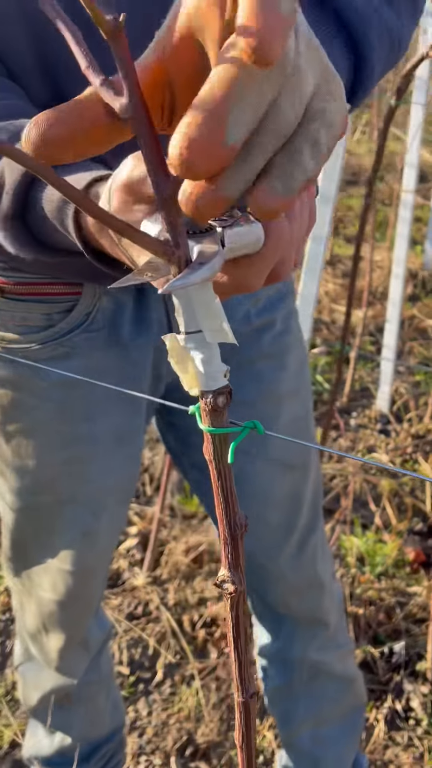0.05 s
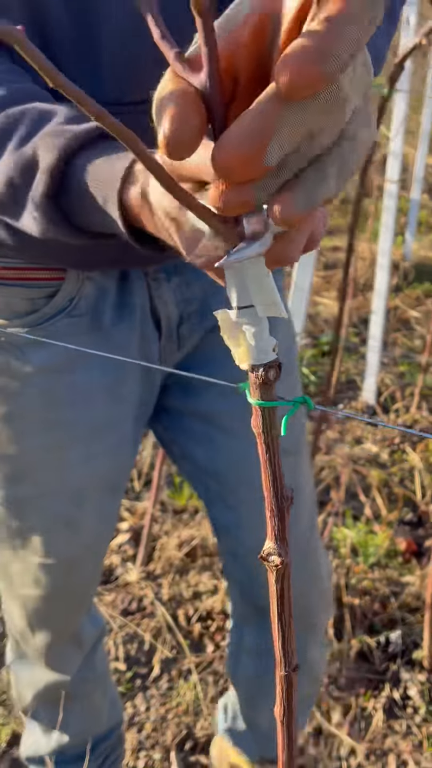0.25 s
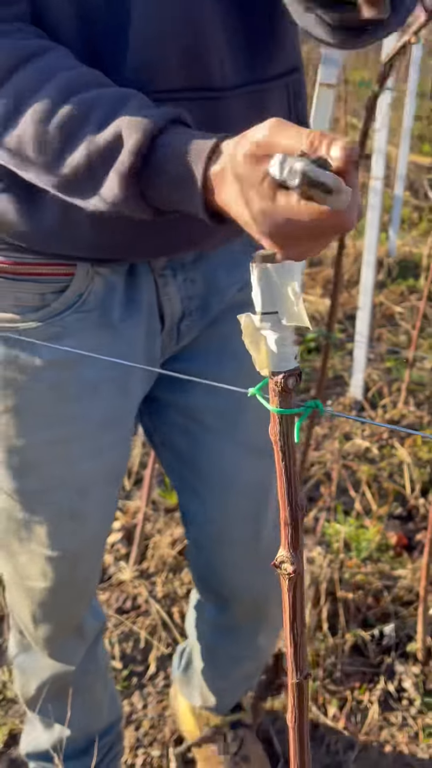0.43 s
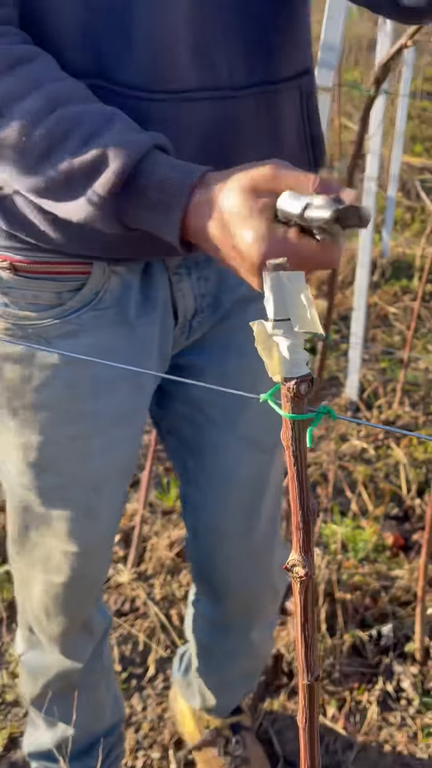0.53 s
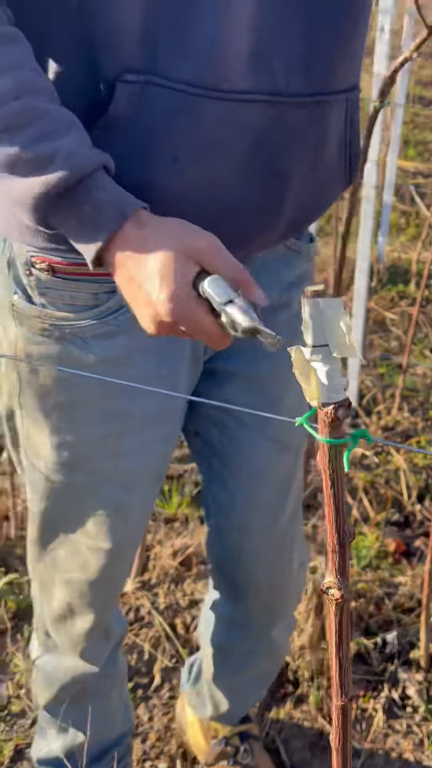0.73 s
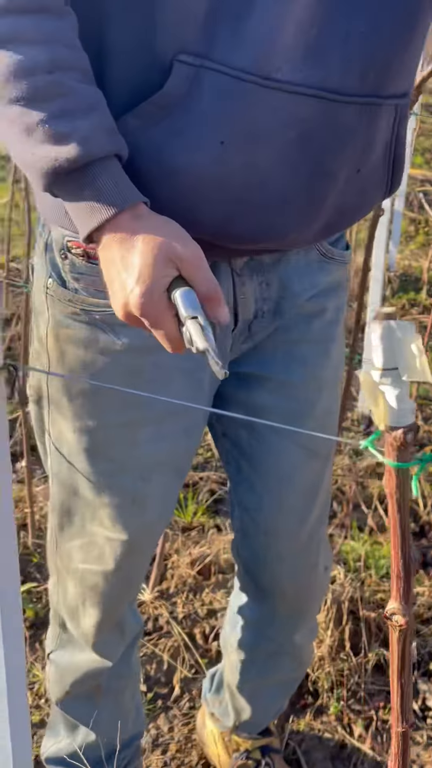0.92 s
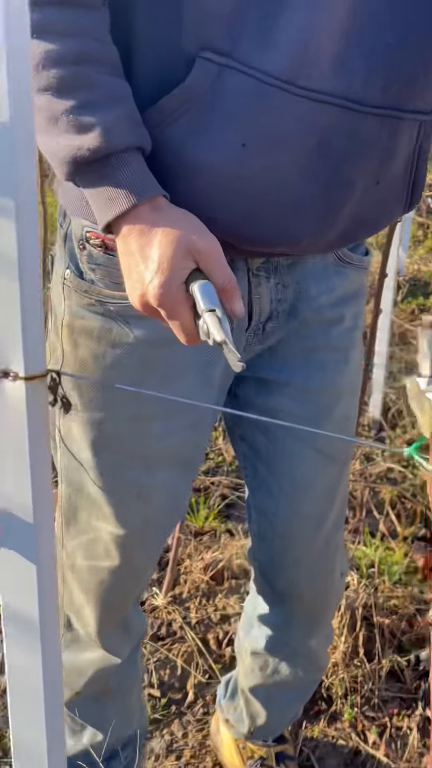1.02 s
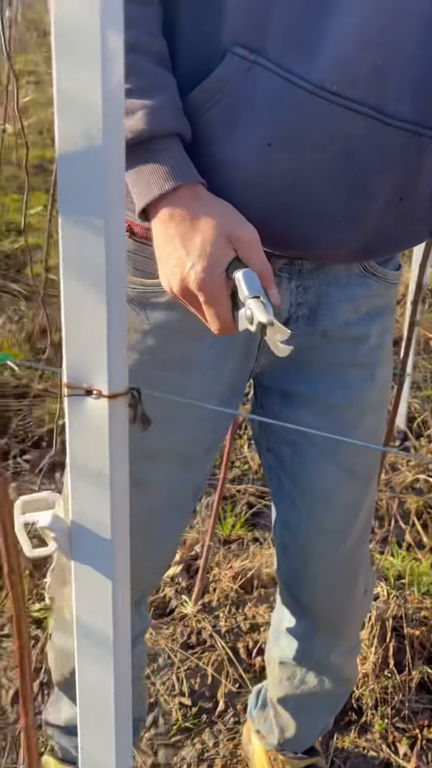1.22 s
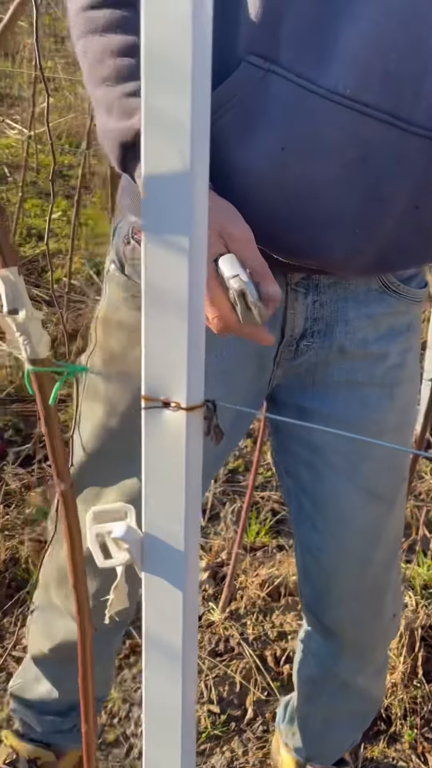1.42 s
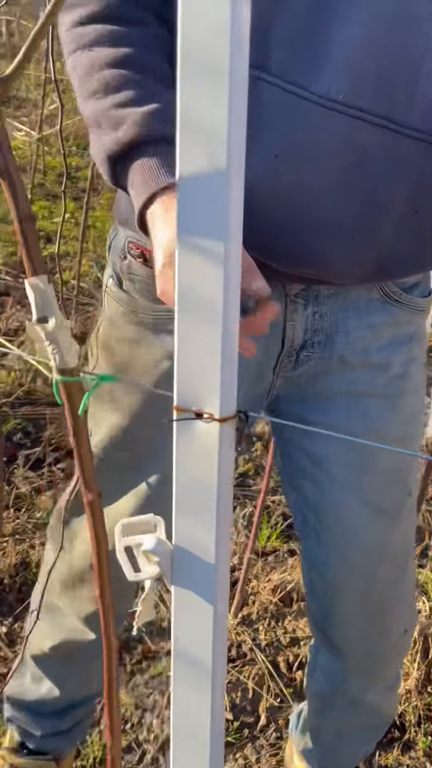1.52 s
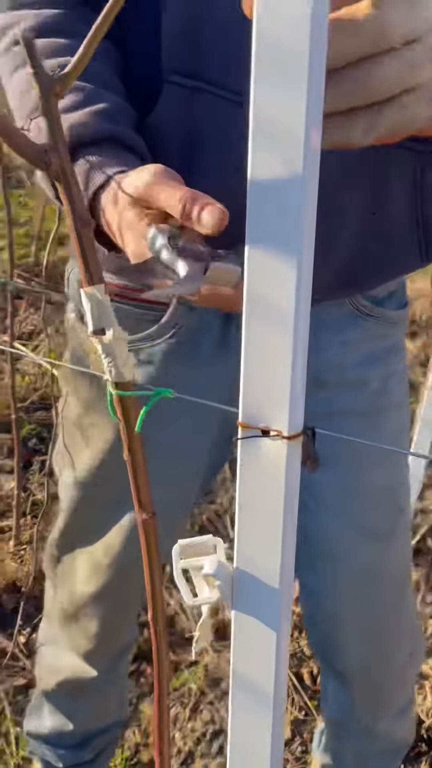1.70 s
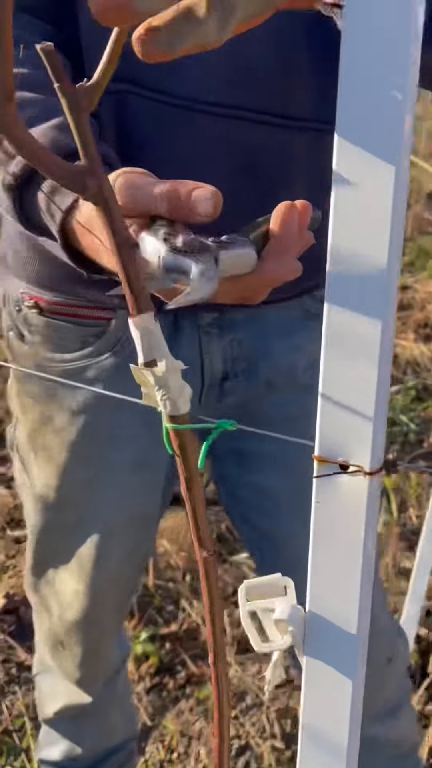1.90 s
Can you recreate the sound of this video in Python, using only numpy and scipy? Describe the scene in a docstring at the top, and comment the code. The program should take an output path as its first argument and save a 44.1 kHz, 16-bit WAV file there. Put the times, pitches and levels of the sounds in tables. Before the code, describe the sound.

Close to the microphone in an open field, pruning shears cut a woody stem with a brief crunch and a sharp snap. Light clothing rustle and crisp crackles of dry stalks follow as someone takes a few soft steps.

```python
"""Hand pruners cut a woody stem close by: fibres crack one by one over a crunch, the stem snaps
and rings, the handles thud on their stop, the blades click. The worker then steps over dry plants,
which rustle and crackle, with soft footfalls and boot knocks. Brief rubs, three faint tones and
a low outdoor rumble lie behind. Cracks are decaying noise bursts; thuds are damped sines."""
import sys
import numpy as np
from scipy import signal
from scipy.fft import rfft, irfft, next_fast_len
from scipy.io import wavfile
from scipy.ndimage import uniform_filter1d

SR = 44100
rng = np.random.default_rng(int(sys.argv[2]) if len(sys.argv) > 2 else 0)


def transcribe(u):
    """Save the signal u as a 16-bit wav file named by the first command-line argument.

    u: samples, shape (n,) or (channels, n), limited to [-1, 1]; the rate is SR.
    q: integer samples, one column per channel.
    """
    v = np.clip(np.atleast_2d(u).T, -1, 1)
    q = np.round(v * 32767).astype(np.int16)
    wavfile.write(sys.argv[1], SR, q)


N = 85995

# Levels are taken ahead of each layer's gain and filters.
# fibres giving way under the blade: t/s, level/dB
FIBRE_BREAKS = [(.2027, -31), (.2042, -29), (.2105, -38), (.2232, -38), (.2316, -29), (.2458, -26),
                (.2565, -25), (.2592, -20), (.2677, -17), (.2778, -29), (.2810, -28)]
# envelope of wood being crushed and torn: t/s, level/dB
CRUNCH_ENVELOPE = [(.228, -49), (.258, -37.5), (.285, -32.5), (.297, -44.5), (.316, -38), (.338, -82)]
# fractures of the final snap: t/s, level/dB
SNAP_BREAKS = [(.2888, -30), (.2909, -18), (.2936, -11), (.2966, -12.5), (.2996, -20), (.3052, -29)]
# stem resonances: f/Hz, level/dB re each break
WOOD_MODES = [(1600, -19.5), (2550, -19)]
# handles hitting their stop and rebounding: t/s, level/dB
HANDLE_HITS = [(.3012, -20), (.3063, -30)]
# steel touching steel: t/s, level/dB
BLADE_HITS = [(.3003, -21), (.3110, -17)]
# dry stalks breaking: t/s, level/dB, woody body/dB re level
STALK_BREAKS = [(0.3658, -38, -11.5), (0.411, -37.5, -12.5), (0.4486, -37, -12), (0.5483, -46, -4),
                (0.624, -48.5, 3), (0.7387, -34.5, -6), (0.8322, -30.5, -15.5), (0.8542, -26, -16.5),
                (0.888, -33, -19), (0.9085, -31, -15), (0.98, -34.5, -20), (1.0373, -25.5, -12),
                (1.083, -24.5, -15), (1.187, -26, -27), (1.2636, -30.5, -13.5), (1.2770, -35, -7.5),
                (1.29, -27.5, -14.5), (1.3368, -25.5, -16), (1.4006, -30, -39), (1.444, -36, -22),
                (1.547, -37.5, -12.5), (1.5813, -27.5, -19), (1.717, -37, -12), (1.8406, -31, -12),
                (1.9428, -26, -13)]
# brittle stalks parting in one tick: t/s, level/dB
STALK_TICKS = [(.079, -32), (1.0962, -13.5), (1.2772, -14.5), (1.6818, -28)]
# rustle of clothes and plants: t/s, level/dB
RUSTLE_ENVELOPE = [(0, -42), (.05, -51.5), (.33, -47), (.39, -56), (.50, -61), (.725, -49.5), (.76, -46.5),
                   (.95, -53.5), (1.065, -53.5), (1.11, -45.5), (1.19, -46), (1.245, -62.5), (1.295, -50.5),
                   (1.37, -44.5), (1.50, -52.5), (1.57, -45), (1.62, -55.5), (1.66, -44.5), (1.69, -56),
                   (1.77, -48.5), (1.89, -62), (1.95, -43)]
# treble shelf of the rustle: t/s, gain/dB
RUSTLE_SHELF = [(.3, -4), (.8, -5), (1.1, -0.5), (1.55, -2), (1.8, -3)]
# footfalls: peak t/s, level/dB, 1/e half width/s
FOOTFALLS = [(0.61, -53.5, 0.032), (1.298, -49.5, 0.049), (1.841, -48.5, 0.064)]
# boot knocks on soil: t/s, level/dB
BOOT_KNOCKS = [(1.039, -38), (1.718, -39)]
# rubs of gloves, blade and boots: t/s, centre f/Hz, level/dB
RUBS = [(.008, 614, -51), (0.083, 1070, -46.5), (0.11, 1750, -51), (0.63, 900, -56), (0.8, 1320, -49.5),
        (1.822, 1350, -49.5)]
# background tones: peak t/s, f/Hz at the peak, level/dB
FAINT_TONES = [(.385, 760, -56), (.422, 465, -55), (.685, 530, -56)]
# source spectra: f/Hz, relative level/dB
FIBRE_SPECTRUM = [(100, -6), (600, -12), (1150, -3.5), (1900, 2), (2700, -4), (3500, -13), (4500, -4.5),
                  (7200, -1), (9200, -2), (11000, 3), (12300, -12), (13500, -23)]
SNAP_SPECTRUM = [(100, -21.5), (400, -11.5), (680, -23), (1300, -6), (2100, -7), (2550, 0), (3200, -2),
                 (3800, -19), (4600, -0.5), (7400, -0.5), (11200, 0.5), (12100, -7.5), (12700, -4.5),
                 (13700, -27)]
BLADE_SPECTRUM = [(1000, -7), (7000, -11), (9300, -24), (10400, 6.5), (11400, -15), (13000, -37)]
CRISP_SPECTRUM = [(2000, -61), (4000, -9), (6000, -14.5), (7200, 1.5), (9000, 1), (10300, 5), (11200, 1),
                  (12200, -8), (13200, -19), (16000, -43)]
WOODY_SPECTRUM = [(100, -34.5), (500, -4), (2600, 1.5), (3700, -4.5), (6000, 5), (16000, -50)]
RUSTLE_SPECTRUM = [(100, -3.5), (260, -0.5), (700, -5), (1500, -8), (3800, -7.5), (5000, -8), (6500, -1.5),
                   (8500, -6), (10600, 6), (11700, -7), (12600, -15), (14000, -57)]
STEP_SPECTRUM = [(20, -15), (75, 2), (130, -5), (2000, -65)]
AIR_SPECTRUM = [(20, -8), (40, -0.5), (70, 2.5), (250, -14.5), (1000, -14), (10000, -41), (14000, -79)]
# stereo balance of cut and ground: f/Hz, left minus right level/dB
CUT_BALANCE = [(100, 7), (400, -11.5), (950, 14.5), (1400, 1), (2000, -8), (2900, -9.5), (4300, 6),
               (5200, -0.5)]
GROUND_BALANCE = [(100, 2.5), (300, -12), (750, 10), (1500, 4.5), (2300, -.5)]
# phase lead of left over right: f/Hz, phase/rad
LEFT_LEAD = [(250, 0), (500, 1.3), (1000, 3.2), (1500, 5.4), (2400, 6.5), (3450, 6.4), (4000, 7.5),
             (5500, 12.2), (6500, 12.8), (8100, 15.3), (9500, 15.75), (12000, 18.85)]


def stem(ring_t60_s=0.0067):
    """Fibres crack over a rising crunch, then the stem snaps in a volley; each break rings the wood."""
    t = np.arange(N) / SR
    fibres = amp(4) * bursts(FIBRE_BREAKS, t60_s=0.0035, tail_db=-16, tail_t60_s=0.035)
    crunch = amp(curve(CRUNCH_ENVELOPE)) * grainy(grains_per_s=700, spread_db=4, apart_db=-12)
    crunch *= (t > CRUNCH_ENVELOPE[0][0]) & (t < CRUNCH_ENVELOPE[-1][0])
    snap = amp(2) * bursts(SNAP_BREAKS, t60_s=0.0068, tail_db=-13, tail_t60_s=0.045)
    ring = np.zeros(N)
    for at_s, db in FIBRE_BREAKS + SNAP_BREAKS:
        age_s = np.maximum(t - at_s, 0)
        for hz, mode_db in WOOD_MODES:
            ring += amp(db + mode_db - 60 * age_s / ring_t60_s) * np.sin(2 * np.pi * hz * age_s)
    return coloured(fibres + crunch, FIBRE_SPECTRUM) + coloured(snap, SNAP_SPECTRUM) + ring


def pruners():
    """Handles thud on their stop; the blades click as they close and open."""
    thud = amp(6) * thumps(HANDLE_HITS, hz=365, t60_s=0.0085)
    clicks = bursts(BLADE_HITS, t60_s=0.007, tail_db=-15, tail_t60_s=0.035)
    return thud + coloured(clicks, BLADE_SPECTRUM)


def dry_stalks():
    """Stalks break and splinter as the worker moves; thicker ones add a woody body."""
    cracks = splintered([(at_s, db) for at_s, db, _ in STALK_BREAKS])
    bodies = [(at_s, db + body_db) for at_s, db, body_db in STALK_BREAKS]
    crisp = amp(1.5) * bursts(cracks, t60_s=0.0068, tail_db=-17.5, tail_t60_s=0.056)
    woody = amp(1) * bursts(bodies, t60_s=0.016, tail_db=-4.5, tail_t60_s=0.092)
    ticks = bursts(STALK_TICKS, t60_s=0.002, tail_db=-19, tail_t60_s=0.024)
    stalks = coloured(crisp + ticks, CRISP_SPECTRUM) + coloured(woody, WOODY_SPECTRUM)
    return patchy(stalks, depth_db=3)


def rustle(shelf_hz=7500):
    """Clothes and dry plants rustle: grainy noise of varying level and treble."""
    grains = coloured(grainy(grains_per_s=580, spread_db=4, apart_db=-5.5), RUSTLE_SPECTRUM)
    treble = filtered(grains, lambda hz: 1 - 1 / (1 + (hz / shelf_hz) ** 8))
    shelved = grains + (amp(curve(RUSTLE_SHELF)) - 1) * treble
    return amp(curve(RUSTLE_ENVELOPE)) * patchy(shelved, depth_db=2.6)


def footsteps():
    """Boots on soil: soft swells of low noise and two dull knocks."""
    weight = sum(amp(db) * swell(at_s, half_s) for at_s, db, half_s in FOOTFALLS)
    low_noise = unit(coloured(noise_pair(apart_db=-5.5), STEP_SPECTRUM))
    return weight * low_noise + thumps(BOOT_KNOCKS, hz=350, t60_s=0.018)


def scuffs():
    """Gloves, blade and boots rub: each a short swell of band noise."""
    out = np.zeros((2, N))
    for at_s, hz, db in RUBS:
        friction = band(noise_pair(apart_db=45), hz, half_octaves=0.66)
        out += amp(db) * swell(at_s, half_s=0.0072) * friction
    return out


def faint_tones(rise_octaves_per_s=0.84):
    """Brief background tones, each rising slightly in pitch."""
    t = np.arange(N) / SR
    out = np.zeros(N)
    for at_s, hz, db in FAINT_TONES:
        glide_hz = hz * 2 ** (rise_octaves_per_s * (t - at_s))
        out += amp(db) * swell(at_s, half_s=0.019) * np.sin(2 * np.pi * np.cumsum(glide_hz) / SR)
    return out


def air(level_db=-55.5):
    """Steady low rumble of the open field, independent in each channel."""
    return amp(level_db) * unit(coloured(rng.standard_normal((2, N)), AIR_SPECTRUM))


def bursts(events, t60_s, tail_db, tail_t60_s):
    """Per event, a short near-mono crack with a weaker, longer, diffuse tail."""
    t = np.arange(SR // 5) / SR
    out = np.zeros((2, N + SR))
    crack_decay = amp(-60 * t / t60_s)
    crack_rms = np.sqrt(np.mean(crack_decay ** 2))
    tail_decay = amp(tail_db - 60 * t / tail_t60_s)
    for at_s, db in events:
        crack = crack_rms * unit(crack_decay * noise_pair(apart_db=-34, size=len(t)))
        tail = tail_decay * noise_pair(apart_db=7.5, size=len(t))
        start = round(at_s * SR)
        out[:, start:start + len(t)] += amp(db) * (crack + tail)
    return out[:, :N]


def splintered(events, count=2, max_delay_s=0.007, splinter_db=-7):
    """The breaks, each followed by weaker splinters at random delays."""
    splinters = [(at_s + delay_s, db + splinter_db)
                 for at_s, db in events for delay_s in max_delay_s * rng.random(count)]
    return events + splinters


def thumps(events, hz, t60_s, rise_s=0.00074, high_pass_hz=121):
    """Dull blows: one low mode swings up and dies within a few cycles."""
    out = np.zeros(N)
    for at_s, db in events:
        age_s = np.maximum(np.arange(N) / SR - at_s, 0)
        envelope = amp(db - 60 * age_s / t60_s) * (1 - np.exp(-age_s / rise_s))
        out += envelope * np.sin(2 * np.pi * hz * age_s)
    return signal.sosfilt(signal.butter(2, high_pass_hz, 'high', fs=SR, output='sos'), out)


def grainy(grains_per_s, spread_db, apart_db):
    """Stereo noise in tiny grains of uneven strength, rms 1."""
    knots = np.clip(rng.standard_normal(N), -2.5, 2.5)
    strength = np.interp(np.arange(N) * grains_per_s / SR, np.arange(N), knots)
    return unit(amp(spread_db * strength) * noise_pair(apart_db))


def patchy(x, depth_db):
    """Random gain over time and frequency, as different stalks take part."""
    frames = signal.stft(x, nperseg=512)[2]
    field = rng.standard_normal(frames.shape[1:])
    field = uniform_filter1d(uniform_filter1d(field, size=9, axis=0), size=6, axis=1)
    return signal.istft(frames * amp(depth_db * unit(field)), nperseg=512)[1][:, :N]


def noise_pair(apart_db, size=N):
    """Stereo noise, rms 1: a shared part plus each channel's own, apart_db re the shared."""
    noise = rng.standard_normal((3, size))
    return unit(noise[0] + amp(apart_db) * noise[1:])


def coloured(x, spectrum):
    """Minimum-phase filter that keeps the level of white noise."""
    def response(hz):
        cepstrum = irfft(np.log(unit(amp(along(spectrum, hz)))))
        half = len(cepstrum) // 2
        return np.exp(rfft(np.r_[cepstrum[0], 2 * cepstrum[1:half], np.zeros(half)]))
    return filtered(x, response)


def band(x, centre_hz, half_octaves):
    """Bell-shaped band of x, rms 1."""
    return unit(filtered(x, lambda hz: np.exp(-(np.log2((hz + 1) / centre_hz) / half_octaves) ** 2)))


def panned(x, balance):
    """Constant-power pan per frequency."""
    def response(hz):
        left_db = along(balance, hz)
        return np.sqrt(2 / (1 + amp([-left_db, left_db]) ** 2))
    return filtered(x, response)


def filtered(x, response):
    """x through a complex frequency response."""
    size = 2 * next_fast_len(N)
    return irfft(rfft(x, size) * response(np.fft.rfftfreq(size, 1 / SR)), size)[..., :N]


def swell(at_s, half_s):
    """Gaussian envelope, 1/e at half_s from its peak."""
    return np.exp(-((np.arange(N) / SR - at_s) / half_s) ** 2)


def curve(rows):
    """(t/s, value) rows as one value per sample."""
    return np.interp(np.arange(N) / SR, *np.transpose(rows))


def along(rows, hz):
    """(f/Hz, value) rows read on a log axis."""
    knots_hz, values = np.transpose(rows)
    return np.interp(np.log(hz + 1), np.log(knots_hz + 1), values)


def amp(db):
    """dB to gain."""
    return 10 ** (np.asarray(db) / 20)


def unit(x):
    """x at rms 1."""
    return x / np.sqrt(np.mean(x ** 2) + 1e-20)


def scene():
    """The close cut, the ground below, the air around."""
    cut = stem() + pruners()
    ground = dry_stalks() + rustle() + footsteps() + scuffs()
    return panned(cut, CUT_BALANCE) + panned(ground, GROUND_BALANCE) + faint_tones() + air()


def record(dry):
    """Band-limited microphone pair; left leads right in phase."""
    top_hz, edge_hz = 15800, 400

    def response(hz):
        phase_rad = np.outer([0.5, -0.5], along(LEFT_LEAD, hz))
        low_pass = np.clip((top_hz - hz) / edge_hz + 0.5, 0, 1)
        return np.exp(1j * phase_rad) * low_pass
    return filtered(dry, response)


dry = scene()
out = record(dry)
transcribe(out)
```